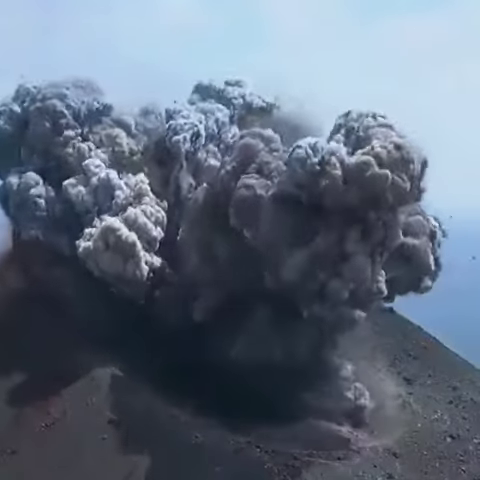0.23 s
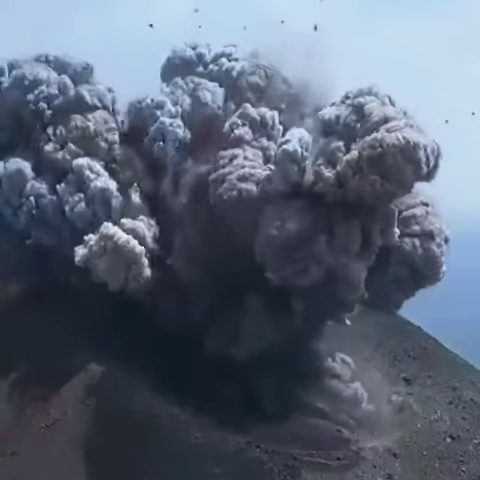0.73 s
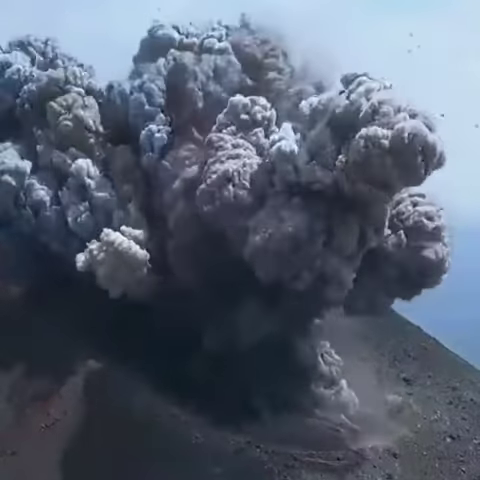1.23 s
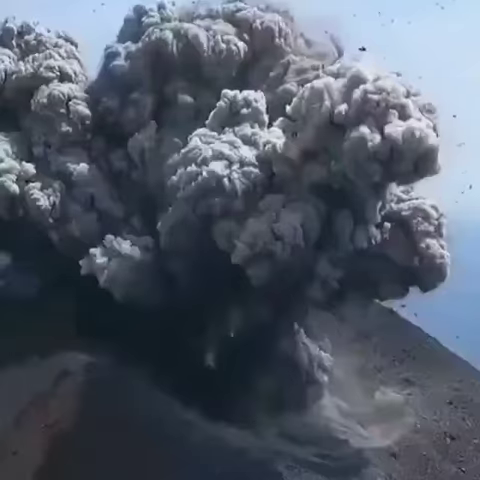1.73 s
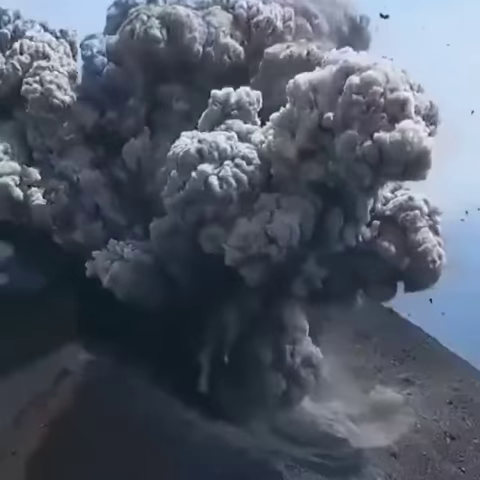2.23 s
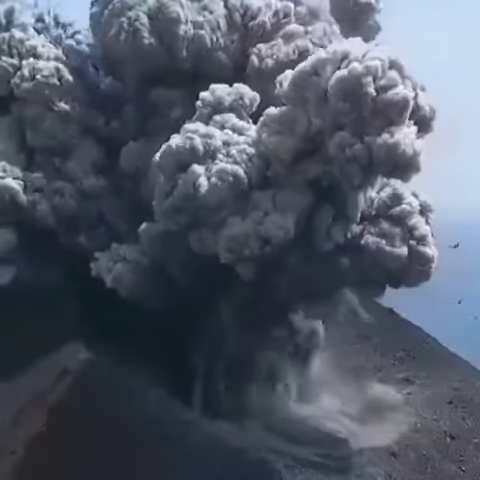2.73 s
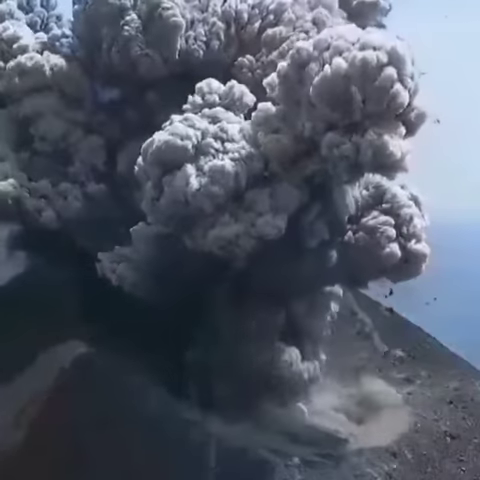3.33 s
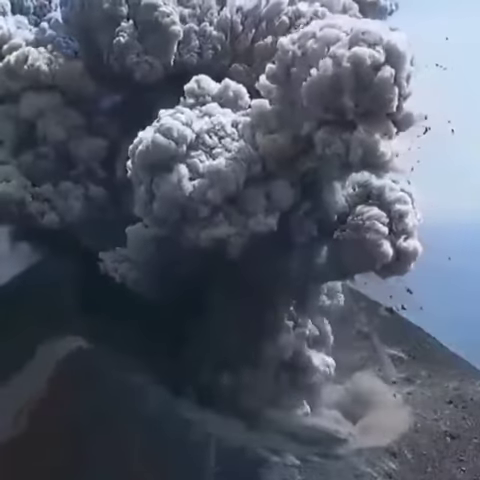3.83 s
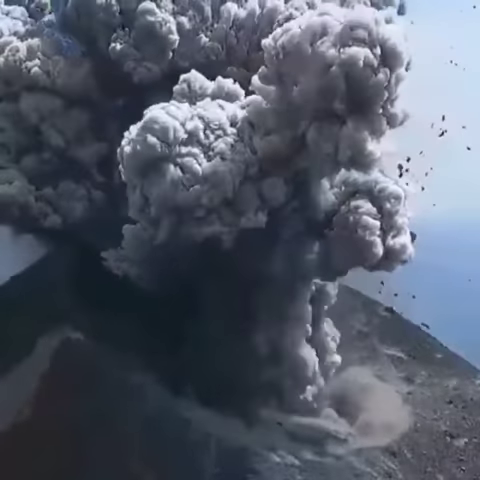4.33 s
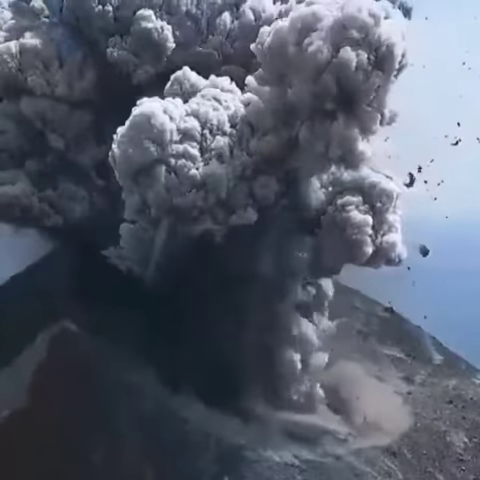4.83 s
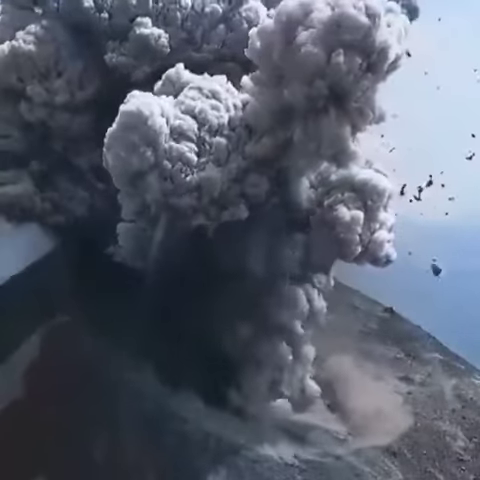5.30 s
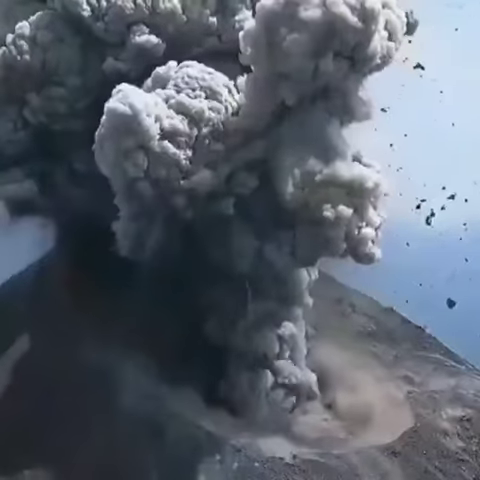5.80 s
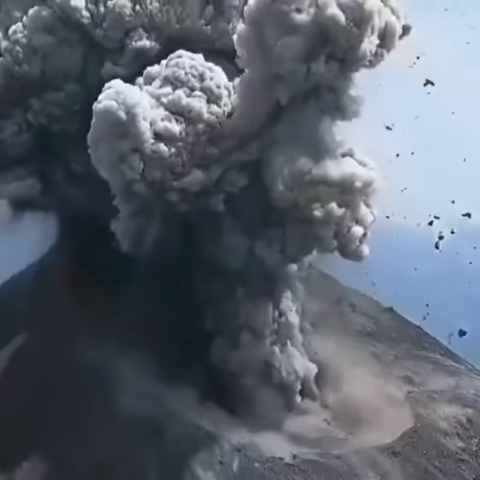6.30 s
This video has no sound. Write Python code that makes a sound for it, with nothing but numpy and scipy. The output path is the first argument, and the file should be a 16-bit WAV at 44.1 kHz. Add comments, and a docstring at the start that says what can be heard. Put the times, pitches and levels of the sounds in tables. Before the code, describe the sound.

A volcanic jet roars at once, broad and low-heavy, with a hollow vent tone sinking in pitch and a deep rumble. It steadily fades. Wind gusts buffet and overload the microphone mid-way, with one sharp click. Then rubble rushes in and rocks land with low thuds, gritty cracks and a few ringing knocks, thickening to the end. Open air, single-channel sound.

```python
"""A volcano blasts out ash, heard above the crater: its gas jet, noise mixed with small shocks, roars and fades
under a growing rush of rubble, made of noise and random impulses. A hollow vent tone sinks in pitch.
Rocks land as short low waves and bursts of cracking noise; some split with a ringing knock. Gusts, slow
pressure swings, overload the microphone. A sharp click, probably a glitch, is a sudden step in the signal;
a tiny tick is a flare of the treble, and a few faint high chirps are gliding tones with a diffuse echo."""
import sys
import numpy as np
from scipy import signal
from scipy.fft import rfft, irfft, next_fast_len
from scipy.io import wavfile
from scipy.ndimage import uniform_filter1d, map_coordinates

SR = 44100
rng = np.random.default_rng(int(sys.argv[2]) if len(sys.argv) > 2 else 0)


def generate_wav(signal):
    """Clip the signal to [-1, 1] and save it as 16-bit WAV at the path in sys.argv[1]."""
    frames = np.transpose(np.atleast_2d(signal))
    scaled = np.clip(frames, -1, 1) * 32767
    pcm = np.round(scaled).astype(np.int16)
    wavfile.write(sys.argv[1], SR, pcm)


N = 288968
TIME = np.arange(N) / SR  # seconds

# Tone colours, as relative power at each frequency: [frequency_hz, level_db per Hz]
JET_SPECTRUM = [(120, -18), (200, -5.5), (240, -7.5), (290, -6), (360, -4.5), (430, -2.5), (500, -2),
                (590, -4.5), (790, -6), (1010, -6.5), (1400, -12), (2000, -18), (2600, -21.5), (4400, -77)]
RUBBLE_SPECTRUM = [(120, -44), (190, -3.5), (240, -10), (300, -6), (360, -9), (440, -6), (560, -5.5),
                   (730, -5.5), (920, -9.5), (1350, -13), (1700, -18.5), (2600, -28), (4400, -90)]
ASH_SPECTRUM = [(820, -21), (1400, -3), (1700, -9), (2400, -8), (3200, -10.5), (4100, -16.5), (5200, -26.5),
                (6800, -39), (11500, -100)]
GRIT_SPECTRUM = [(3500, -41), (5000, -17), (6200, -0.5), (8000, 1.5), (11400, -3), (12200, -19),
                 (14000, -60)]
PLUME_SPECTRUM = [(21, 7.5), (36, 1.5), (62, -1), (85, 4), (120, 2.5), (170, -1), (230, -9), (320, -7),
                  (430, -13), (730, -90)]
DRUMMING_SPECTRUM = [(21, -30), (38, 3.5), (55, 3), (72, 1.5), (100, -1), (135, -2), (175, -5.5),
                     (230, -5.5), (320, -14.5), (430, -29), (730, -90)]
WIND_SPECTRUM = [(2, -20), (7, 9.5), (16, -1), (24, -9), (34, -8.5), (50, -22.5), (110, -41), (250, -62),
                 (500, -120)]
STONE_SPECTRUM = [(100, -21), (250, 2), (360, -0.5), (520, -5.5), (750, -5.5), (1200, -9.5), (1800, -16.5),
                  (3500, -29), (6000, -39), (12000, -73)]

# The jet swells again: [centre_s, half_width_s, rise_db]
JET_SURGES = [(.26, 0.3, 0.5), (1.25, .22, 1.5), (2.3, 0.06, 2)]
# Falling rubble: [time_s, patter_level_db, ash_hiss_level_db]
RUBBLE_FALL = [(0, -32, -54), (2.35, -28.5, -33), (3.7, -29, -35.5), (4.2, -27, -34), (4.55, -28, -33),
               (4.8, -26.5, -32.5), (5.35, -26, -32.5), (5.85, -24.5, -30.5), (6.55, -25.5, -32)]
# Level of the treble, a fine grit: [time_s, level_db]
GRIT_LEVEL = [(0, -53.5), (.4, -54.5), (1.3, -56), (1.8, -61), (2.6, -55.5), (3.9, -58), (6.55, -55)]
# The treble flares briefly, down to a tiny tick: [centre_s, half_width_s, rise_db]
TREBLE_FLARES = [(.1, 0.025, 9), (.28, 0.032, 9), (1.33, 0.034, 5.5), (4.586, .004, 13)]
# The vent howls up in pulses: [centre_s, half_width_s, rise_db]
VENT_PULSES = [(.24, 0.062, 8), (.72, .09, 6.5), (1.1, 0.14, 4), (1.36, 0.074, 5), (2.35, 0.1, 6)]
# Gusts on the microphone: [hold_start_s, hold_s, level_db]
GUSTS = [(1.38, 0.22, -11), (1.72, 0.17, -11.5), (1.944, 0.33, -13), (2.646, 0.073, -4), (2.857, 0.15, -9),
         (3.103, 0.037, -3), (3.23, 0.18, -3), (3.438, 0.085, -8), (3.613, 0.064, -13), (3.736, 0.05, -7.5),
         (5.86, 0.11, -12.5), (6.16, 0.03, -7.5)]
# Rocks landing: [start_s, thud_level_db, thud_pitch_hz, thud_decay_cycles,
# crack_level_db, crumble_s (time to fade by 60 dB), crack_pitch_hz]
ROCKS = [(2.37, -30, 180, .5, -17, 0.11, 704), (3.880, -12, 141, 0.34, -17, 0.056, 750),
         (3.9116, -11, 200, .8, -13, 0.035, 1000), (3.919, -20, 248, 1.2, -12.5, 0.18, 420),
         (4.2543, -10, 214, 0.6, -18, 0.065, 700), (4.372, -25, 180, 0.54, -18.5, 0.075, 950),
         (4.395, -33, 200, .5, -20, 0.14, 1400), (4.425, -30, 220, .5, -18.5, 0.074, 800),
         (4.546, -18, 220, .5, -21, 0.028, 1200), (4.593, -25, 150, .5, -14, 0.037, 2300),
         (4.634, -26, 220, .8, -12.5, 0.058, 553), (4.773, -10, 92, 1.8, -37, 0.079, 400),
         (4.903, -14, 140, 0.87, -17, 0.28, 470), (4.928, -12, 148, 0.92, -22, .07, 480),
         (5.159, -6.5, 107, 0.6, -13.5, 0.036, 650), (5.261, -13, 152, .8, -29, .05, 500),
         (5.292, -16, 130, .8, -25, .05, 600), (5.418, -20, 130, 0.62, -31, .05, 500),
         (5.492, -10, 130, 0.53, -18, 0.06, 600), (5.613, -15, 150, 0.68, -31, 0.06, 454),
         (5.631, -20, 150, 0.59, -15, 0.093, 560), (5.668, -11, 110, 0.9, -18, 0.17, 710),
         (5.707, -14, 149, .6, -12.5, 0.098, 540), (5.7398, -6, 131, 0.62, -20, .07, 800),
         (5.83, -10, 190, 0.73, -17, 0.08, 655), (5.9107, -0.5, 143, 0.58, -14, 0.046, 450),
         (5.975, -19, 150, .6, -19, .06, 560), (5.997, -19, 160, 0.64, -19.5, 0.25, 516),
         (6.1753, -12, 149, 0.38, -16, 0.092, 745), (6.2117, -3, 138, 0.34, -18, 0.034, 400),
         (6.2144, -10, 215, 1, -28, .03, 400), (6.422, -11.5, 140, .6, -17, .05, 700),
         (6.541, -8, 194, 1.2, -13.5, 0.26, 640)]
# The level dips briefly: [centre_s, half_width_s, depth_db]
DIPS = [(2.685, 0.024, 5.5)]
# A sharp click, probably a glitch: [start_s, step_db]
CLICKS = [(3.088, -5.5)]
# Faint chirps: [start_s, length_s, start_pitch_hz, top_pitch_hz, final_drop_hz, level_db]
CHIRPS = [(3.341, .022, 7600, 7800, 60, -46), (3.52, 0.046, 7700, 8020, 120, -47),
          (3.6, .078, 5280, 5500, 560, -48), (5.135, 0.12, 5200, 5360, 640, -49)]
# Rocks splitting as they hit: [start_s, knock_level_db, pitch_hz, ring_cycles]
SPLITS = [(3.9137, -7.5, 565, 1.06), (3.919, 0, 402, 1.3), (4.3738, -20, 1000, 2.2), (4.429, -12, 796, 1),
          (4.5475, -6, 750, .8), (4.6332, -16, 1200, 2), (4.6362, -17, 424, 1.2), (4.9305, -12, 600, 1),
          (5.161, -10, 750, 1.2), (5.7085, -16, 520, 1), (5.713, -12, 1150, 3.4), (6.002, -13, 650, 1),
          (6.1785, -8, 740, 7.6)]

# The jet fades at a steady rate apart from its surges; the plume's rumble fades more slowly
JET_DB, JET_FADE_DB_PER_S = -11.5, 6.5
PLUME_DB, PLUME_FADE_DB_PER_S = -13, 5
JET_ASH_DB = -9  # the jet's own ash hiss, relative to the jet
# Deep drumming at the heaviest fall, and its rise for each dB of rubble
DRUMMING_DB, DRUMMING_DB_PER_RUBBLE_DB = -19.5, 2.01
# The vent's tone sinks in pitch; faster random wobbling makes it broader
VENT_START_HZ, VENT_END_HZ, VENT_SETTLE_S = 540.2, 426.7, 0.4
VENT_WOBBLE_KNOTS_PER_S = 190
VENT_DB, VENT_FADE_DB_PER_S = -22.5, 5
BREEZE_DB, GUST_ATTACK_S, GUST_RELEASE_S = -19.5, 0.035, 0.067
TOP_HZ = 15500  # band limit of the finished sound


def amp(db):
    """Turn decibels into gain."""
    return 10 ** (np.asarray(db) / 20)


def unit(x):
    """Scale to an average strength (rms) of 1."""
    return x / np.sqrt(np.mean(x ** 2) + 1e-20)


def curves(rows):
    """Draw one line over time for each column after the time."""
    s, *columns = np.transpose(rows)
    return [np.interp(TIME, s, column) for column in columns]


def bumps(rows):
    """Add up brief bell-shaped changes in dB from (centre s, half width s, dB) rows."""
    return sum(db * np.exp(-((TIME - s) / width) ** 2) for s, width, db in rows)


def wobble(rate):
    """Make a smooth random curve with this many knots a second."""
    return map_coordinates(rng.standard_normal(1024), [TIME * rate + 2], mode="wrap")


def filtered(x, response):
    """Multiply each frequency of x by a response."""
    size = next_fast_len(len(x) + 8192)
    spectrum = rfft(x, size) * response(np.fft.rfftfreq(size, 1 / SR))
    return irfft(spectrum, size)[:len(x)]


def coloured(x, spectrum):
    """Shape x through (Hz, dB) points, keeping the power of a white input."""
    point_hz, point_db = np.transpose(spectrum)

    def response(hz):
        return unit(amp(np.interp(np.log(hz + 1), np.log(point_hz + 1), point_db)))

    return filtered(x, response)


def noise(patchy_db):
    """Make turbulent noise whose gain drifts in patches of time and frequency."""
    cells = signal.stft(rng.standard_normal(N), nperseg=512)[2]
    patches = uniform_filter1d(rng.standard_normal(cells.shape), size=7, axis=0)
    patches = uniform_filter1d(patches, size=12, axis=1)
    patchy = cells * amp(patchy_db * unit(patches))
    return unit(signal.istft(patchy, nperseg=512)[1][:N])


def shots(rate, spread_db):
    """Make random impulses of uneven size, about rate a second, with rms 1."""
    happens = rng.random(N) < rate / SR
    sign = rng.choice([-1, 1], N)
    size = amp(spread_db * np.clip(rng.standard_normal(N), -2, 2))
    return unit(happens * sign * size)


def blend(a, b, share):
    """Mix two unrelated sounds; share is the power of the second."""
    share = np.clip(share, 0, 1)
    return np.sqrt(1 - share) * a + np.sqrt(share) * b


def add(track, s, sound):
    """Lay a sound into the track at s seconds."""
    part = track[max(round(s * SR), 0):][:len(sound)]
    part += sound[:len(part)]


def eruption():
    """The jet with its small shocks gives way to rubble; both bring a hiss of ash, and the plume rumbles."""
    jet_level = amp(JET_DB - JET_FADE_DB_PER_S * TIME + bumps(JET_SURGES))
    rubble_db, rubble_ash_db = curves(RUBBLE_FALL)
    grit_db, = curves(GRIT_LEVEL)
    puffs = wobble(rate=22)  # puffs of gas move all the upper bands together

    jet_mix = blend(noise(patchy_db=0.64), shots(rate=700, spread_db=3.5), share=0.29)
    jet = unit(coloured(jet_mix, JET_SPECTRUM))
    rubble_mix = blend(noise(patchy_db=0.5), shots(rate=260, spread_db=3.5), share=0.21)
    rubble = unit(coloured(rubble_mix, RUBBLE_SPECTRUM))
    roar = amp(0.23 * puffs) * (jet_level * jet + amp(rubble_db) * rubble)

    ash_mix = blend(noise(patchy_db=2.0), shots(rate=1200, spread_db=2.5), share=0.3)
    ash = unit(coloured(ash_mix, ASH_SPECTRUM))
    ash_level = np.hypot(amp(JET_ASH_DB) * jet_level, amp(rubble_ash_db))
    grit_mix = blend(noise(patchy_db=1.8), shots(rate=500, spread_db=6), share=0.15)
    grit = unit(coloured(grit_mix, GRIT_SPECTRUM))
    grit_level = amp(grit_db + bumps(TREBLE_FLARES) + 2.1 * puffs)
    hiss = ash_level * amp(0.5 * puffs) * ash + grit_level * grit

    # Far landings in soft ash are a deep irregular drumming that takes over from the plume
    plume = unit(coloured(noise(patchy_db=0.86), PLUME_SPECTRUM))
    plume_db = PLUME_DB - PLUME_FADE_DB_PER_S * TIME
    drumming = unit(coloured(shots(rate=300, spread_db=1.0), DRUMMING_SPECTRUM))
    drumming_db = DRUMMING_DB + DRUMMING_DB_PER_RUBBLE_DB * (rubble_db - rubble_db.max())
    return roar + hiss + amp(plume_db) * plume + amp(drumming_db) * drumming


def vent():
    """The jet excites a broad, hollow resonance that sinks in pitch as the pressure falls."""
    hz = VENT_END_HZ + (VENT_START_HZ - VENT_END_HZ) * np.exp(-TIME / VENT_SETTLE_S)
    phase = 2 * np.pi * np.cumsum(hz) / SR
    cosine_part = wobble(rate=VENT_WOBBLE_KNOTS_PER_S) * np.cos(phase)
    sine_part = wobble(rate=VENT_WOBBLE_KNOTS_PER_S) * np.sin(phase)
    level_db = VENT_DB - VENT_FADE_DB_PER_S * TIME + bumps(VENT_PULSES)
    return amp(level_db) * unit(cosine_part + sine_part)


def wind():
    """Eddies on the microphone port make slow, heavy pressure swings; gusts rise, hold and die to a breeze."""
    strength = np.full(N, amp(BREEZE_DB))
    for s, hold_s, db in GUSTS:
        rise = np.clip(1 + (TIME - s) / GUST_ATTACK_S, 0, 1)
        release = np.exp(-np.maximum(TIME - s - hold_s, 0) / GUST_RELEASE_S)
        strength = np.maximum(strength, amp(db) * rise * release)
    eddies = unit(coloured(rng.standard_normal(N), WIND_SPECTRUM))
    power = uniform_filter1d(uniform_filter1d(eddies ** 2, size=SR // 8), size=SR // 12)
    swings = strength * eddies / np.sqrt(np.abs(power) + 1e-6)  # the gust sets their size
    return swings / (1 + swings ** 4) ** (1 / 4)  # the largest ones level off


def rocks(crest_cycles=0.74, rise_cycles=0.56, body_db=10, body_octaves=0.54, grain_db=3.5,
          attack_s=0.0014, scatter_db=-15, scatter_s=0.36):
    """Each landing pushes out a low wave of a few swings; the rock cracks in spurts and fragments scatter."""
    out, t = np.zeros(N), np.arange(SR // 3) / SR
    for s, thud_db, thud_hz, decay_cycles, crack_db, crumble_s, crack_hz in ROCKS:
        cycles = t * thud_hz
        before_crest = np.minimum(cycles - crest_cycles, 0)
        after_crest = np.maximum(cycles - crest_cycles, 0)
        swell = np.exp(-(before_crest / rise_cycles) ** 2 - after_crest / decay_cycles)
        add(out, s, amp(thud_db) * swell * np.sin(2 * np.pi * cycles))

        def body(hz):  # the rock boosts the sound around its own pitch
            octaves = np.log2((hz + 1) / crack_hz)
            return amp(body_db * np.exp(-(octaves / body_octaves) ** 2))

        unevenness = uniform_filter1d(rng.standard_normal(len(t)), size=SR // 400)
        spurts = amp(grain_db * unit(unevenness))
        debris = filtered(coloured(spurts * rng.standard_normal(len(t)), STONE_SPECTRUM), body)
        crumbling = amp(-60 * t / crumble_s)
        scattering = amp(scatter_db - 60 * t / scatter_s)
        fade = np.hypot(crumbling, scattering) * (1 - np.exp(-t / attack_s))
        debris_rms = np.sqrt(np.average(debris ** 2, weights=fade ** 2))
        add(out, s, amp(crack_db) * fade * debris / debris_rms)
    return out


def clicks(relax_s=0.0057, snap_db=-8, snap_s=0.0002):
    """A sharp click, probably a glitch: a sudden step with a short snap that relaxes slowly."""
    out, t = np.zeros(N), np.arange(SR // 10) / SR
    for s, db in CLICKS:
        step = np.exp(-t / relax_s)
        snap = amp(snap_db) * np.exp(-t / snap_s)
        add(out, s, -amp(db) * (step + snap))
    return out


def chirps(hook_power=4, swell_db=4):
    """Thin, fluttering whistles swell and creep up in pitch, then hook down, perhaps a small bird."""
    out = np.zeros(N)
    for s, length_s, start_hz, top_hz, drop_hz, db in CHIRPS:
        progress = np.clip((TIME - s) / length_s, 0, 1)  # 0 at the start, 1 at the end
        waver_hz = 80 * wobble(rate=700)
        flutter_db = 3.5 * wobble(rate=160)
        glide_hz = start_hz + (top_hz - start_hz) * progress - drop_hz * progress ** hook_power
        tone = np.sin(2 * np.pi * np.cumsum(glide_hz + waver_hz) / SR)
        shape = np.sqrt(np.abs(np.sin(np.pi * progress)))
        out += amp(db + flutter_db + swell_db * progress) * shape * tone
    return out


def slopes(x, echo_db=-7, t60_s=0.35):
    """The rocky slopes scatter a diffuse tail, fading 60 dB in t60_s, after a distant sound."""
    t = np.arange(SR // 2) / SR
    tail = rng.standard_normal(len(t)) * amp(-60 * t / t60_s)
    return x + amp(echo_db) * signal.fftconvolve(x, tail / np.linalg.norm(tail))[:N]


def splits(attack_s=0.0002, overtone=2.33, overtone_db=-6, overtone_cycles=2):
    """A rock splitting on impact makes a sudden pressure jump that rings briefly, with an overtone."""
    out, t = np.zeros(N), np.arange(SR // 20) / SR

    def ring(hz, cycles):
        return np.exp(-hz * t / cycles) * np.sin(2 * np.pi * hz * t)

    for s, db, hz, cycles in SPLITS:
        knock = ring(hz, cycles) + amp(overtone_db) * ring(overtone * hz, overtone_cycles)
        add(out, s, amp(db) * (1 - np.exp(-t / attack_s)) * knock)
    return out


def scene():
    """All layers add up in one channel; the volcano and rocks dip briefly as the first strong gust hits."""
    volcano = eruption() + vent() + rocks() + splits()
    dipped = amp(-bumps(DIPS)) * volcano
    return (dipped + wind() + clicks() + slopes(chirps()))[None]


def record(dry):
    """The largest swings are rounded off at full scale, then a steep filter removes the highest treble."""
    clipped = dry[0] / (1 + np.abs(dry[0]) ** 20) ** (1 / 20)
    return filtered(clipped, lambda hz: 1 / (1 + (hz / TOP_HZ) ** 80))[None]


dry = scene()
out = record(dry)
generate_wav(out)
```